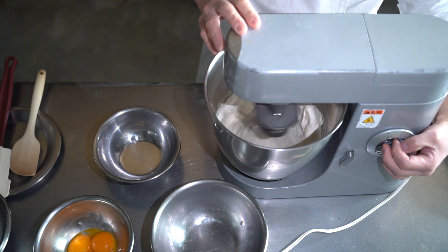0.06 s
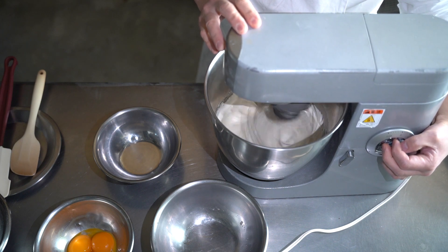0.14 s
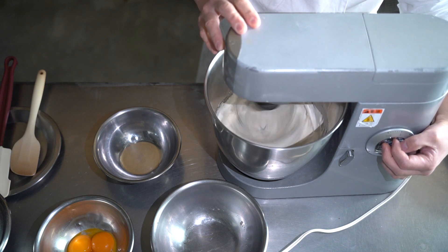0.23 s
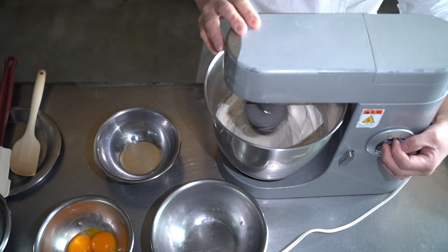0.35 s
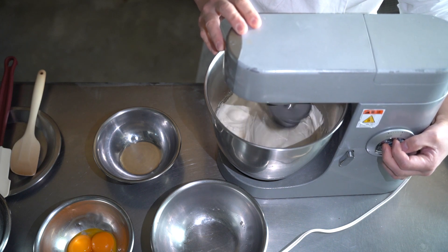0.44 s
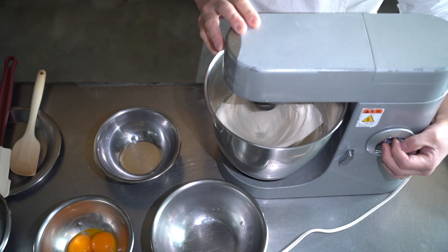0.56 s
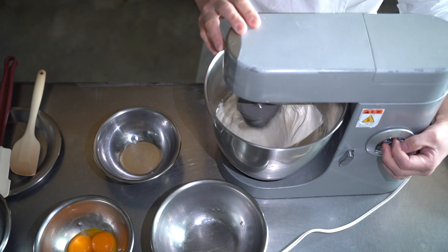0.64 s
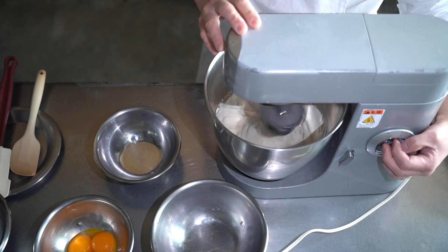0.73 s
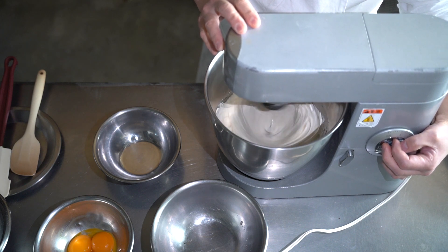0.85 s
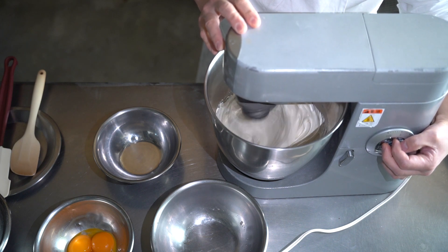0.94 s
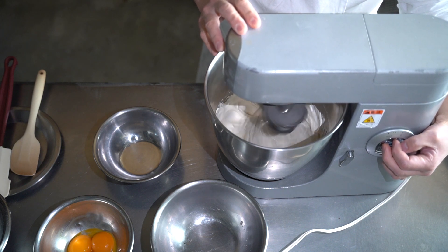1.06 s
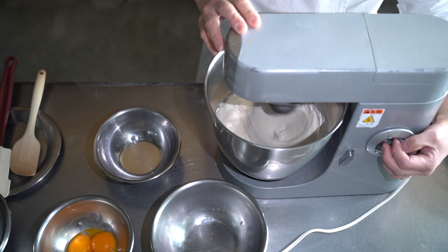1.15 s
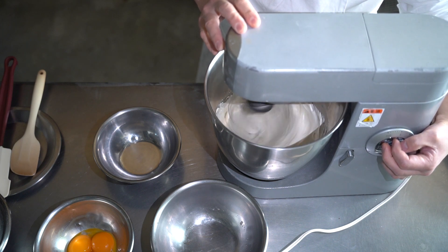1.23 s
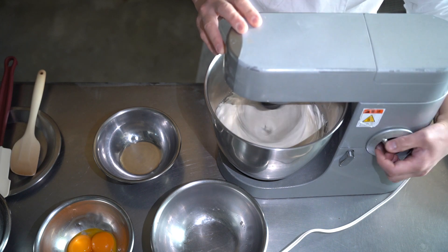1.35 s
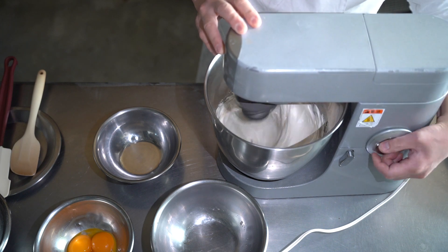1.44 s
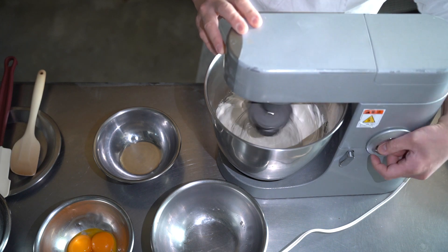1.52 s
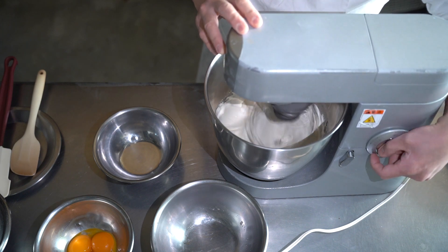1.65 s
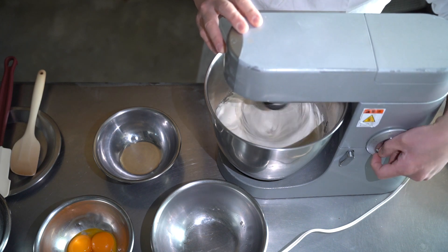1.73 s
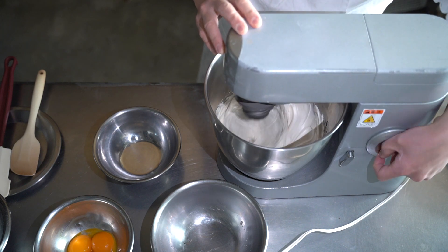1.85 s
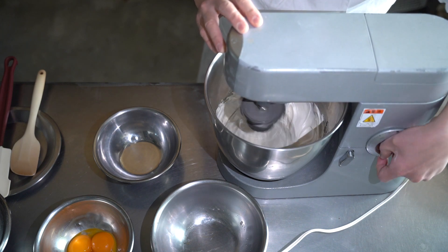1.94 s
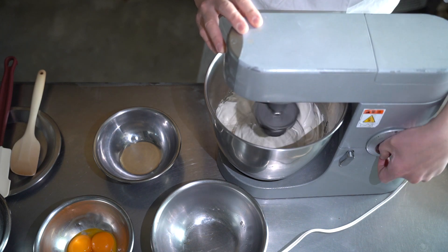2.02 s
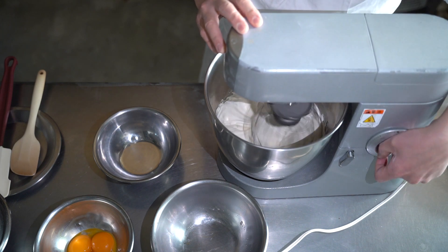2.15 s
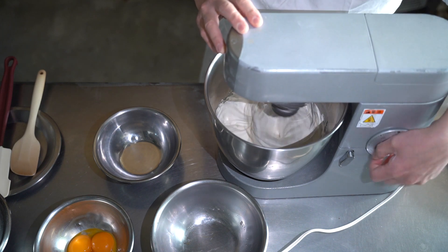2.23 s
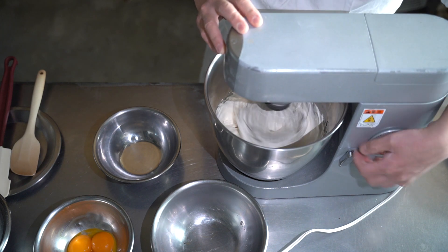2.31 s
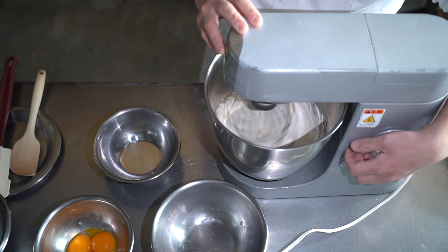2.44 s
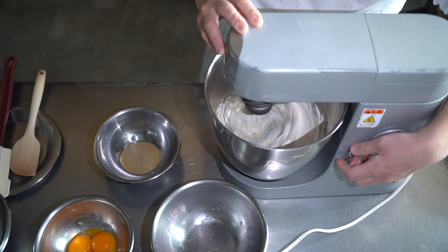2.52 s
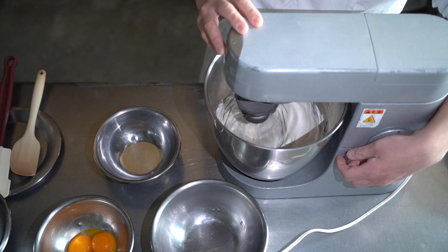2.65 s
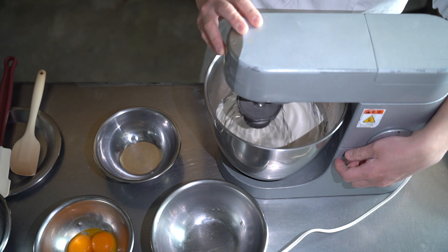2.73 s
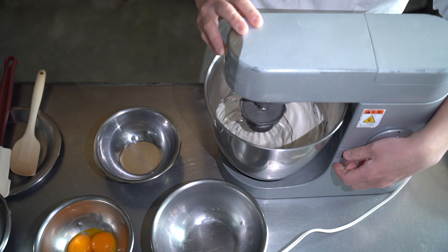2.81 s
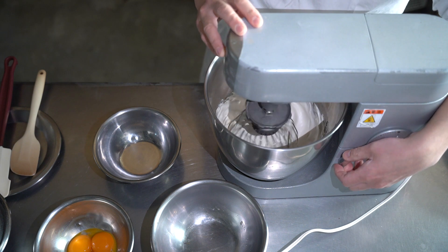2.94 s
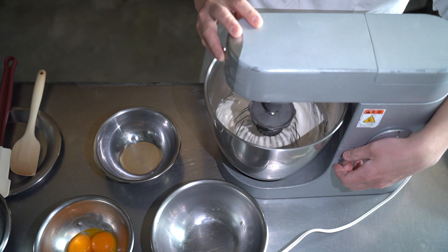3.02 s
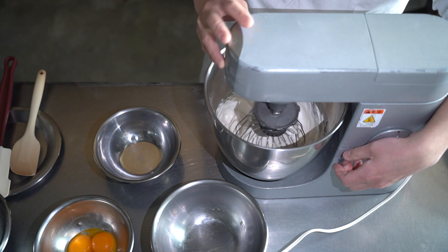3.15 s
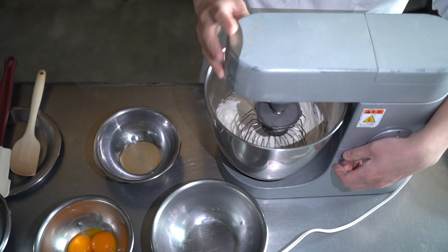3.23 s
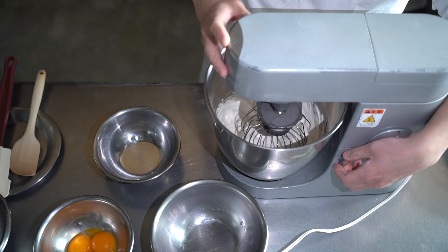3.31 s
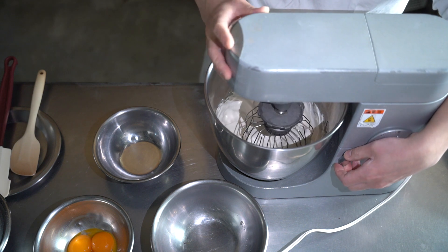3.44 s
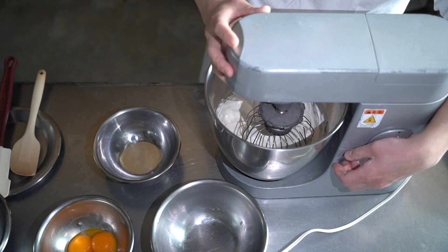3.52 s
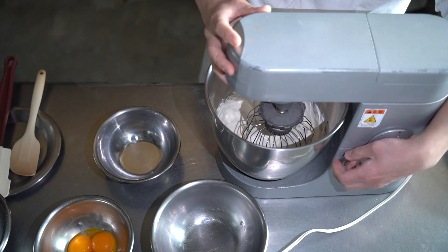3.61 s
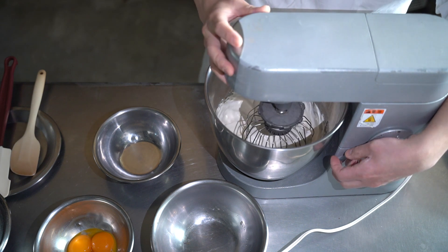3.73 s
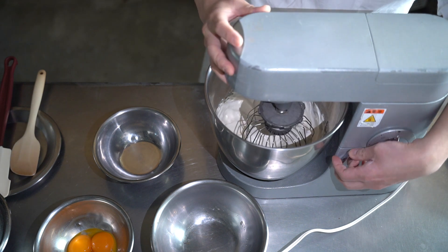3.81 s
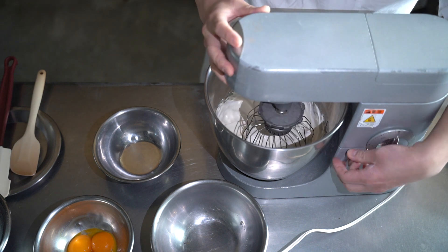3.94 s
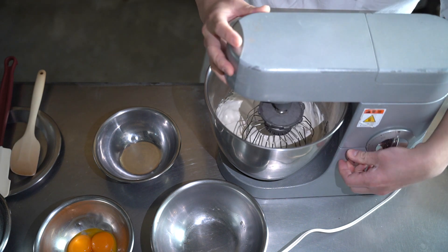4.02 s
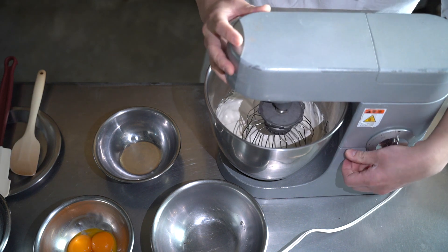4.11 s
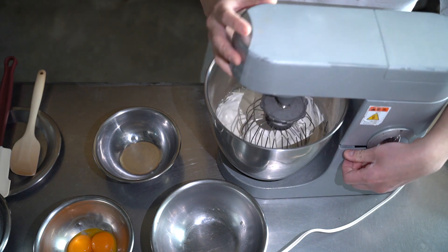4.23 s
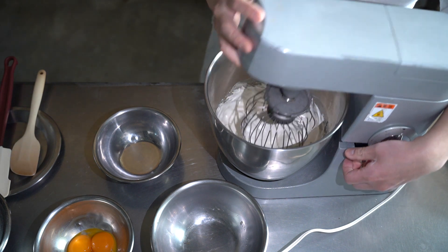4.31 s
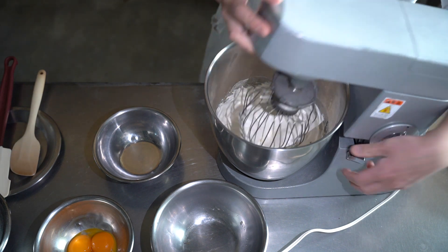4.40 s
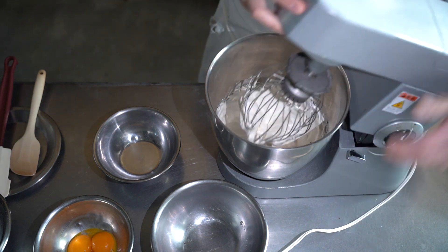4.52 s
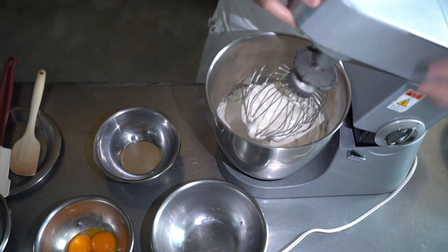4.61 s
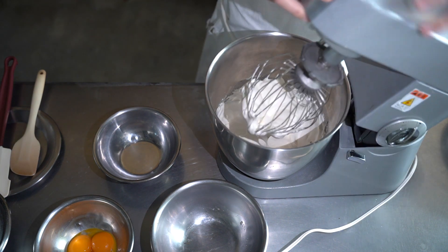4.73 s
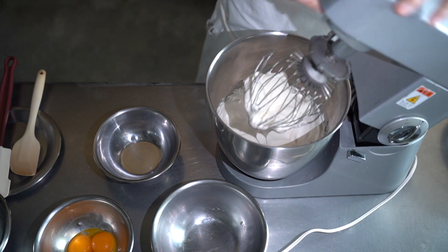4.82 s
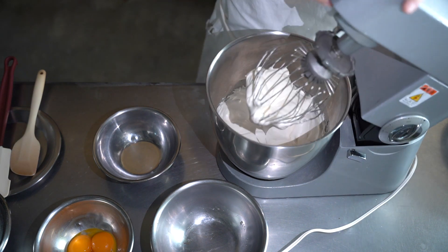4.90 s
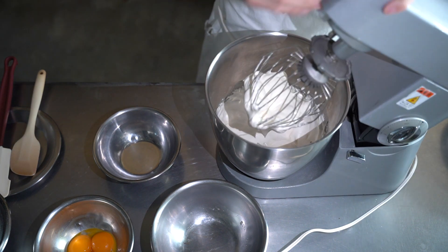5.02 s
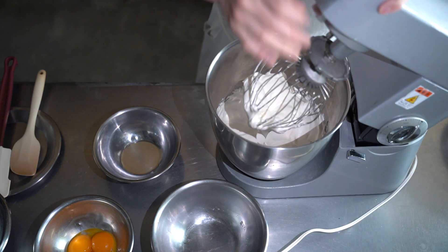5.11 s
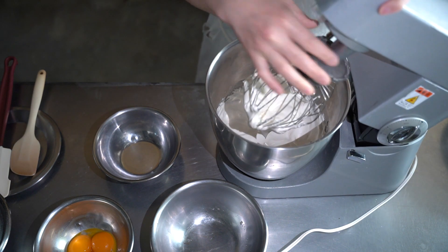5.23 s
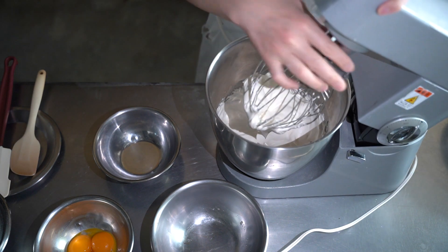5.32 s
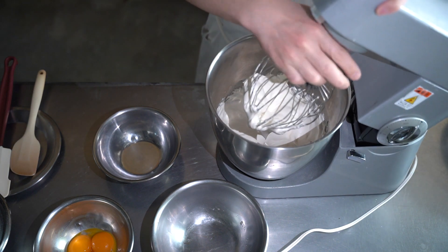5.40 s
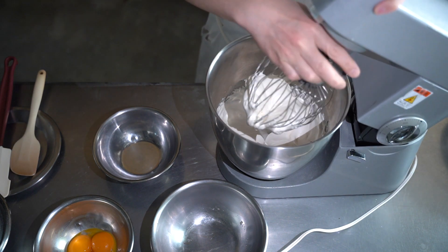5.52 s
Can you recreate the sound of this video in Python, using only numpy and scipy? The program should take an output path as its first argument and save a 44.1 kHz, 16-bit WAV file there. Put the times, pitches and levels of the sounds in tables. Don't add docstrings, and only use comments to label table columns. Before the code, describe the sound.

From 0 to 1.4 s a stand mixer runs at steady high speed, close and right of centre: a buzzy motor tone near 205 Hz, a strong whine around 2 kHz, rough gear noise, whisk hiss and small crisp slaps of cream on a steel bowl. Power cuts at 1.42 s; a sharp switch snap comes at 1.63 s. The whine slides down, swelling and dipping through resonances, with gear chatter, and fades away by about 3 s; one bright slap at 1.88 s, a faint tick at 2.6 s. A steady soft fan hum with airy noise surrounds everything and now stands out. Faint hand and sleeve rustles from 3.3 s. Lever and catch clicks with hollow metallic knocks at 4.1-4.45 s, hinge rubbing and ticks at 4.6-4.8 s, then a firm latch clack and bright spring snap at 5.03-5.08 s. Light ticks and a very faint high squeak end it, with short kitchen reverberation.

```python
import sys
import numpy as np
from scipy import signal
from scipy.fft import rfft, irfft, next_fast_len
from scipy.io import wavfile
from scipy.ndimage import uniform_filter1d, map_coordinates

SR = 44100
rng = np.random.default_rng(int(sys.argv[2]) if len(sys.argv) > 2 else 0)


def to_linear_factor(level_db):
    exponent = np.asarray(level_db, float) / 20
    return 10 ** exponent


def master_out(mix):
    frames = np.transpose(np.atleast_2d(mix))
    ceiling = np.clip(frames, -1, 1)
    pcm = np.round(ceiling * 32767).astype(np.int16)
    wavfile.write(sys.argv[1], SR, pcm)


N = 245195
TIME = np.arange(N) / SR
CUT_S, FULL_HZ = 1.42, 205.05
# f/Hz, left-right correlation
DIFFUSE_LIKENESS = [(60, 1.0), (180, 1), (550, 0.83), (1650, 0.45), (4970, -0.68), (15000, 0.31)]


def unit(x):
    return x / np.sqrt(np.mean(x ** 2) + 1e-20)


def along(points, hz):
    f, v = np.transpose(points)
    return np.interp(np.log(hz + 1), np.log(f + 1), v)


def wobble(rate):
    coarse = np.arange(0, N + 64, 64) / SR
    knots = rng.standard_normal(int(N * rate / SR) + 4)
    return np.interp(TIME, coarse, map_coordinates(knots, [coarse * rate]))


def filtered(x, response):
    m = next_fast_len(N + SR // 2)
    return irfft(rfft(x, m) * response(np.fft.rfftfreq(m, 1 / SR)), m)[..., :N]


def resonant(modes):
    def response(f):
        return sum((-1) ** k * to_linear_factor(db) * 1j * f * w / (c * c - f * f + 1j * f * w)
                   for k, (c, w, db) in enumerate(modes))
    return response


def housing(f):
    # f/Hz, width/Hz, level/dB
    shell_modes = [(60, 60, -32), (139, 16, -2.5), (205, 71, -8), (327, 84, -17), (1106, 44, 1),
                   (1685, 370, -4.5), (2080, 85, -2), (2440, 360, -2), (5070, 500, -41)]
    return np.sqrt(sum(to_linear_factor(db) ** 2 / (1 + (2 * (f - c) / w) ** 2) for c, w, db in shell_modes))


def frame_db(f):
    # f/Hz, width/Hz, level/dB
    frame_modes = [(850, 90, 5), (1020, 120, -5), (1250, 80, 8), (1390, 140, -17), (1870, 70, -13),
                   (2240, 70, 14), (2750, 600, -18)]
    return sum(db / (1 + (2 * (f - c) / w) ** 2) for c, w, db in frame_modes)


def rush(gain, alike, patchy_db):
    z = signal.stft(rng.standard_normal((2, N)), nperseg=512)[2]
    field = uniform_filter1d(rng.standard_normal(z.shape[1:]), size=8, axis=0)
    field = uniform_filter1d(field, size=6, axis=1)
    pair = signal.istft(z * to_linear_factor(patchy_db * unit(field)), nperseg=512)[1][:, :N]

    def turn(hz):
        return np.arccos(np.clip(along(alike, hz), -1, 1)) / 2

    mid, side = filtered(pair, lambda hz: gain(hz) * [np.cos(turn(hz)), np.sin(turn(hz))])
    return unit(np.array([mid + side, mid - side]))


def placed(pair, balance):
    ear = np.array([[1], [-1]])
    return filtered(pair, lambda hz: to_linear_factor(ear * along(balance, hz) / 2) * np.exp(-2j * np.pi * ear * hz / SR))


def fan():
    # f/Hz, rms level/dB
    hum = [(215, -60.5), (279.5, -47.5), (322, -51.5), (356, -58), (409, -64.5), (521, -66), (780, -68),
           (922, -73), (3380, -75.5), (6700, -79)]
    # f/Hz, density level/dB
    air_colour = [(250, -0.5), (420, -2), (544, -6.5), (783, -7.5), (820, -8), (898, -11.5), (1240, -13),
                  (1980, -17), (2140, -14), (3480, -21), (4500, -23.5), (15900, -42)]
    # f/Hz, density level/dB
    drone_colour = [(15, -72), (25, -57), (59, -21), (109, -27), (135, -0.5), (210, 4), (250, -36),
                    (320, -26), (550, -120)]
    # f/Hz, left minus right level/dB
    room_balance = [(60, 0), (180, 0), (550, -1.5), (1650, -2.5), (4970, -4.5), (15000, -5)]
    tones = np.zeros(N)
    for hz, db in hum:
        level = to_linear_factor(db + 3 + 0.63 * wobble(6.5))
        tones += level * np.sin(2 * np.pi * hz * TIME + 0.3 * wobble(8) + 6 * rng.random())

    def colour(f):
        both = np.hypot(to_linear_factor(-51 + along(air_colour, f)), to_linear_factor(-62 + 7.0 + along(drone_colour, f)))
        return both * np.clip(f / 62, .4, 1) ** 2.8

    air = to_linear_factor(-48.5 + 0.24 * wobble(2.76)) * rush(colour, DIFFUSE_LIKENESS, patchy_db=1.0)
    return placed(tones + air, room_balance)


def kitchen(x):
    # f/Hz, t60/s
    decay = [(200, 0.51), (2000, 0.31), (12000, 0.11)]
    hz, t, z = signal.stft(rng.standard_normal((2, SR // 2)), SR, nperseg=256)
    z = z * np.array([hz >= 0, np.clip(hz / 1500, 0, 1) ** 2])[..., None]
    mid, side = signal.istft(z * to_linear_factor(-60 * t / along(decay, hz)[:, None]), SR, nperseg=256)[1]
    tail = np.array([mid + side, mid - side])
    late = np.pad(x, (200, 0))[None]
    return signal.fftconvolve(late, tail / np.linalg.norm(tail[0]), axes=1)[:, :N]


def strokes(rows, rest_db):
    bells = sum(to_linear_factor(db) ** 2 * np.exp(-2 * ((TIME - s) / length) ** 2) for s, length, db in rows)
    return np.sqrt(to_linear_factor(rest_db) ** 2 + bells)


def rustle():
    # middle t/s, length t/s, level/dB
    rubs = [
        (3.66, 0.042, -66),
        (4.2, 0.32, -64),
        (4.65, 0.089, -54.5),
        (4.8, 0.09, -55.5),
        (5.02, 0.067, -65),
        (5.42, .12, -69),
        (5.56, 0.046, -63),
    ]
    # middle t/s, length t/s, level/dB
    brushes = [
        (3.3, 0.039, -67),
        (3.46, 0.096, -69.5),
        (3.69, .02, -74),
        (4.65, 0.061, -67),
        (4.8, 0.11, -71),
        (4.89, 0.05, -66),
        (4.965, .025, -64),
        (5.46, .04, -77),
    ]
    # f/Hz, level/dB
    cloth = [(4000, -40), (7000, 0), (10500, 2), (12500, -8), (15000, -7.5)]
    age = np.clip(TIME - 5.29, 0, None)
    rise_s, hold_s, t60_s = .012, .12, .45
    held = (1 - np.exp(-age / rise_s)) * to_linear_factor(-70.5 - 60 * np.clip(age - hold_s, 0, None) / t60_s)
    on = np.clip((TIME - 3.1) / 0.057, 0, 1)
    rub = rush(lambda f: housing(f) * (f > 900) * (f < 5500), DIFFUSE_LIKENESS, patchy_db=1.0)
    brush = rush(lambda f: to_linear_factor(along(cloth, f)), DIFFUSE_LIKENESS, patchy_db=1.0)
    squeak = held * to_linear_factor(3 * wobble(40)) * np.sin(2 * np.pi * 10050 * TIME + wobble(60))
    rubbing = strokes(rubs, -66) * to_linear_factor(2.0 * wobble(30)) * rub
    brushing = strokes(brushes, -92) * to_linear_factor(1.5 * wobble(60)) * brush
    return on * (rubbing + brushing + squeak)


def clacks():
    # t/s, peak level/dB, note f/Hz
    knob = [
        (1.6258, -15.5, 4060),
        (1.6268, -17.5, 5300),
    ]
    lever = [
        (4.1674, -41, 4190),
        (4.239, -34.5, 3900),
        (4.2736, -45, 2540),
    ]
    pawl = [
        (4.1712, -28.5, 2136),
        (4.1994, -41, 2080),
        (4.3328, -42, 2100),
        (4.341, -38.5, 2250),
    ]
    catch = [
        (2.6057, -41, 3300),
        (4.0936, -37, 2600),
        (4.444, -37, 3200),
        (4.4455, -38, 2190),
    ]
    hinge = [
        (4.6394, -44, 2200),
        (4.7227, -43.5, 2580),
        (4.794, -54, 2500),
        (5.2544, -51, 2180),
        (5.4011, -44, 2200),
        (5.5503, -48, 2200),
    ]
    latch = [
        (5.03, -28, 3900),
        (5.0362, -31, 2400),
        (5.0798, -39, 2400),
    ]
    spring = [
        (5.0574, -38, 2100),
        (5.0649, -24.5, 2350),
    ]
    # contacts, low knock level/dB, metal level/dB, bright level/dB, t60/s
    parts = [(knob, -21, -6, -21.5, 0.024), (lever, -14, 0, -21.5, 0.034), (pawl, -9, 0, -43, 0.045),
             (catch, -15.5, -1.8, -34, 0.023), (hinge, -13, 0, -33, 0.08), (latch, -12.5, 0, -21, .05),
             (spring, -19.5, -1, -12.5, 0.023)]
    # f/Hz, width/Hz, level/dB
    hollow_modes = [(720, 150, -5.5), (1061, 28, 6), (1250, 120, -3.5)]
    # f/Hz, width/Hz, level/dB
    metal_modes = [(1673, 110, -2.5), (2036, 84, 8), (2130, 300, -1), (2530, 94, 3), (3280, 300, -1),
                   (3620, 270, -1.5), (4100, 360, -8), (5600, 350, -10.5), (6600, 480, -14.5)]
    push, t = np.zeros((4, N + SR)), np.arange(SR // 4) / SR
    for hits, knock_db, metal_db, bright_db, t60 in parts:
        gains_db = np.array([[knock_db + 17.5], [metal_db], [bright_db + 1.0], [-7]])
        for s, db, note_hz in hits:
            decays = to_linear_factor(-60 * t / t60) + 1.87 * to_linear_factor(-60 * t / 0.0099)
            rattle = rng.standard_normal((4, len(t))) * decays
            note = np.sin(2 * np.pi * note_hz * t) * (1 - np.exp(-t / 0.00018))
            rattle[3] = to_linear_factor(-60 * t / (0.74 * t60)) * note
            push[:, round(s * SR):][:, :len(t)] += to_linear_factor(db + gains_db) * rattle

    def crack(f):
        low, high = 1j * f / 4500, f / 11000
        return low ** 2 / (1 + low) ** 2 / (1 + 1j * high - high ** 2) ** 3

    knock, metal, bright, notes = push[:, :N]
    ringing = filtered(knock, resonant(hollow_modes)) + filtered(metal, resonant(metal_modes))
    return ringing + filtered(bright, crack) + notes


def slaps():
    # t/s, peak level/dB, centre f/Hz
    hard = [(0.0374, -25, 10060), (0.0633, -21.5, 13400), (0.1381, -26, 9700), (0.3556, -30, 10800),
            (0.4299, -25, 11200), (0.6459, -24, 9400), (0.8195, -32, 9150), (1.1099, -31, 9400),
            (1.2351, -33, 9800), (1.2985, -27, 10100), (1.3289, -34, 13000), (1.4007, -30, 10400),
            (1.6856, -35, 10400), (1.8756, -23, 13800)]
    out, t = np.zeros(N + SR), np.arange(SR // 30) / SR
    soft = [(0.7 * u, -38 + 6 * (v - .5), 9700 * (1 + .1 * (w - .5))) for u, v, w in rng.random(size=(12, 3))]
    for s, db, hz in hard + soft:
        grain = uniform_filter1d(rng.standard_normal(len(t)), size=5) * np.sin(2 * np.pi * hz * t)
        envelope = to_linear_factor(db - 5.0 - 60 * t / 0.026) * (1 - np.exp(-t / 0.00078))
        out[round(s * SR):][:len(t)] += envelope * unit(grain)
    return out[:N]


def shaft():
    t = np.clip(TIME - CUT_S, 0, None)
    hunt_hz, period_s, crest_s = .5, .62, .06
    driven = FULL_HZ + hunt_hz * np.cos(2 * np.pi * (np.minimum(TIME, CUT_S) - crest_s) / period_s)
    slip = 7 * (1 - np.exp(-t / .012))
    friction_hz, drag_s = 118, 2.15
    coasting = (driven - slip + friction_hz) * np.exp(-t / drag_s) - friction_hz
    return np.clip(coasting, 0, None)


def mixer(turns):
    # level/dB at full speed, power of the speed
    layers = [(-32, 1.7), (-29.5, 1.63), (-40.5, 1.72), (-44, 2.31)]
    # f/Hz, density level/dB
    rumble_colour = [(24, -62), (40, -38), (118, -10), (157, -11.5), (199, -19), (248, -4.5), (381, -2.5),
                     (625, -12.5), (760, -7), (900, -18.5), (1170, -77), (1980, -120)]
    # f/Hz, level/dB
    gear_colour = [(500, -34), (800, 3.5), (1500, -4), (2200, 0), (3000, -8.5), (4500, -19)]
    # f/Hz, density level/dB
    whisk_colour = [(1650, -18), (2800, 0.5), (4290, -2.5), (4750, -0.5), (5090, 0.5), (6030, -5.5),
                    (7000, -11), (9100, -25), (15400, -120)]
    # f/Hz, density level/dB
    fizz_colour = [(4500, -33), (7000, 0.5), (8500, 0.5), (10000, -4), (11500, -9), (15200, -10),
                   (15900, -22)]
    # f/Hz, left-right correlation
    near_likeness = [(60, 1.0), (150, 1.0), (380, 0.97), (950, 0.84), (2380, 0.31), (5980, 0.0019),
                     (15000, 0.04)]
    idle_hz = 13.7
    pace_db = 20 * np.log10((shaft() + idle_hz) / (FULL_HZ + idle_hz))
    rumble_db, gear_db, whisk_db, fizz_db = [db + power * pace_db for db, power in layers]
    off = np.clip((3.6 - TIME) / .5, 0, 1)
    orbit = .5 * np.tanh(wobble(5.56))
    rumble = rush(lambda f: to_linear_factor(along(rumble_colour, f)), near_likeness, patchy_db=1.5)
    rumble = to_linear_factor(rumble_db - 5.0 + .5 * orbit) * rumble
    beat = 1 + 0.16 * np.cos(2 * np.pi * turns) + 0.084 * np.cos(2 * np.pi * turns * .34)
    gears = rush(lambda f: to_linear_factor(along(gear_colour, f)) * housing(f), near_likeness, patchy_db=0.52)
    gears = to_linear_factor(gear_db - 5.0 + orbit) * beat * gears
    spray = 0.82 * wobble(24.56) + 1.4 * wobble(90) + .5 * orbit
    whisk = rush(lambda f: to_linear_factor(along(whisk_colour, f)), near_likeness, patchy_db=0.65)
    whisk = to_linear_factor(whisk_db + 2.14 + 0.29 * spray) * whisk
    fizz = rush(lambda f: to_linear_factor(along(fizz_colour, f)), near_likeness, patchy_db=-0.4)
    fizz = to_linear_factor(fizz_db + 2.0 + 0.6 * spray) * fizz
    return off * (rumble + gears + whisk + fizz)


def bundle(turns):
    # multiple of the speed, width/Hz, rms level/dB
    sidebands = [(12.1, 300, -29), (22.4, 170, -26)]
    speed = shaft()
    coast = np.clip((TIME - CUT_S) / .03, 0, 1) * np.clip((2.65 - TIME) / .3, 0, 1)
    bands = np.zeros(N)
    for k, width_hz, db in sidebands:
        level = to_linear_factor(db + 3 + .5 * frame_db(k * speed))
        carrier = np.sin(2 * np.pi * k * turns)
        bands += level * unit(wobble(width_hz)) * housing(k * speed) ** 1.6 * carrier
    return coast * (speed / speed[0]) ** 2.4 * bands


def whine():
    multiples = [.64, 1, 1.84, 2.6, 9.65, 10, 10.34, 11, 11.52, 12, 13, 21.6]
    # rms level/dB powered, level change/dB coasting
    order_levels = [(-53, -6), (-43.5, -1), (-50, -4), (-53, -8), (-51, -8), (-37.5, -12), (-52, -4),
                    (-41.5, 0), (-55, 0), (-39, -7), (-53, 3), (-75, 3)]
    flutter = [2, 1.8, 2, 2, 2.5, 1.6, 2.5, 2, 3, 1.5, 2.2, 2.5]
    speed = shaft()
    turns = np.cumsum(speed) / SR
    steps = np.linspace(0, FULL_HZ, num=400)
    run = slice(0, 3 * SR)
    coast = np.clip((TIME[run] - CUT_S) / 0.025, 0, 1)
    mesh = {11: 5 + frame_db(11 * speed[run]), 21.6: 6 + frame_db(21.6 * speed[run])}
    lap = {1: 3.5 * np.cos(2 * np.pi * 2.85 * (TIME[run] - .17))}
    out = np.zeros(N)
    for k, (db, coast_db), rough_db in zip(multiples, order_levels, flutter):
        shell = np.interp(speed[run], steps, housing(k * steps) / housing(k * FULL_HZ))
        rough = np.tanh(wobble(8)[run]) + (.5 + .8 * coast) * np.tanh(wobble(35)[run])
        swing = rough_db * rough + lap.get(k, 0)
        jitter = .035 * rough_db * (1 + 1.8 * coast) * wobble(40)[run]
        phase = 2 * np.pi * (k * turns[run] + jitter + rng.random())
        level_db = db + 7.5 + coast * (coast_db + mesh.get(k, 0)) + swing
        out[run] += to_linear_factor(level_db) * shell * np.sin(phase)
    return out * (speed / FULL_HZ) ** 1.67 * np.clip((3.0 - TIME) / 0.24, 0, 1), turns


def scene():
    # f/Hz, left minus right level/dB
    mixer_balance = [(60, 0), (150, 0), (380, -1), (950, -4), (2380, -5.5), (5980, -5.5), (15000, -8.5)]
    tone, turns = whine()
    tone = tone + bundle(turns)
    hits = slaps() + clacks()
    echoes = kitchen(to_linear_factor(-12) * tone + to_linear_factor(-5) * hits)
    near = tone + hits + echoes + mixer(turns) + rustle()
    return placed(near, mixer_balance) + fan()


def roll_off(x):
    return signal.sosfilt(signal.butter(12, 16380, fs=SR, output="sos"), x)


def record(dry):
    def band(hz):
        return (hz < 15880) * (1j * hz / 50 / (1 + 1j * hz / 50)) ** 2

    mix = filtered(dry, band)
    return roll_off(mix)


dry = scene()
out = record(dry)
master_out(out)
```